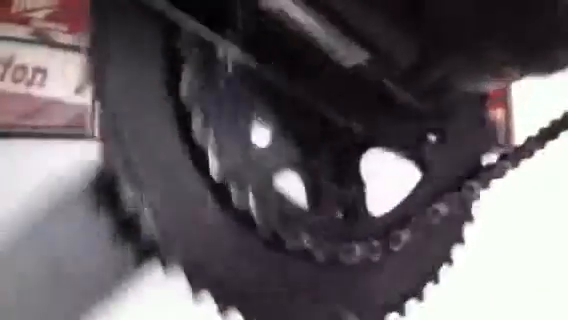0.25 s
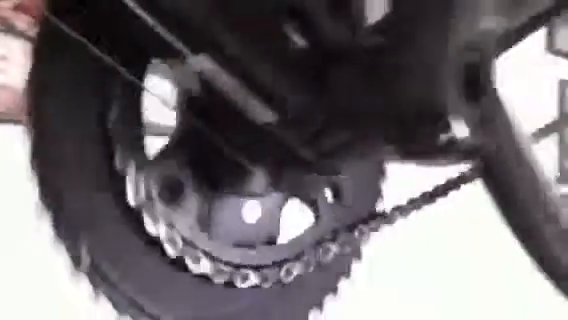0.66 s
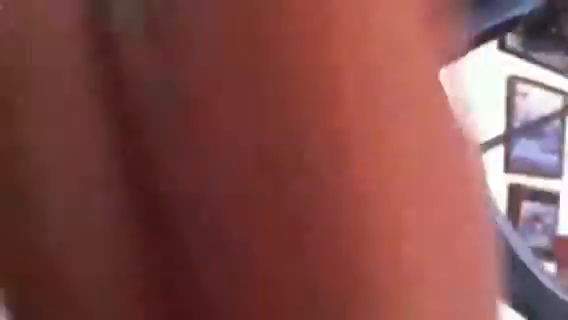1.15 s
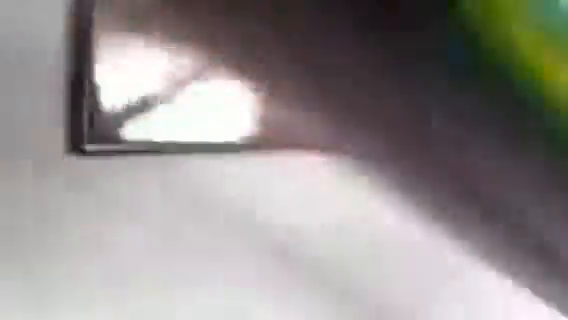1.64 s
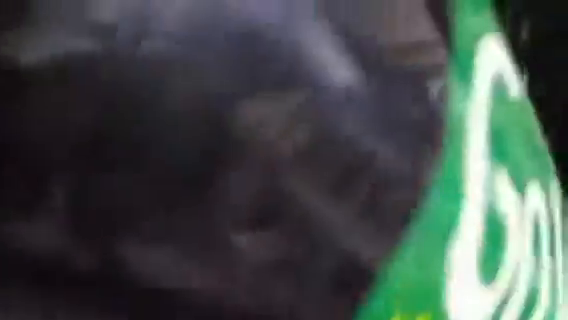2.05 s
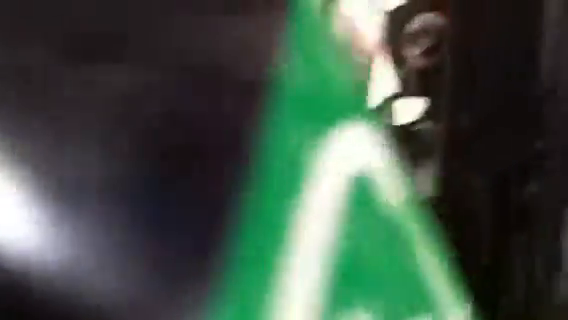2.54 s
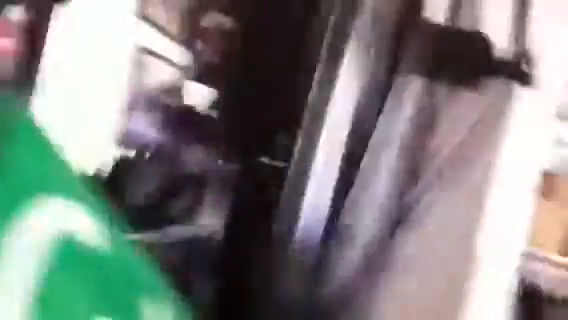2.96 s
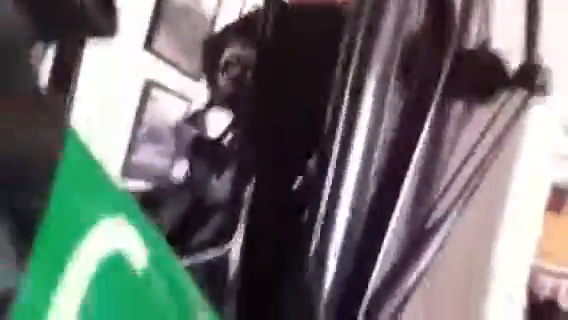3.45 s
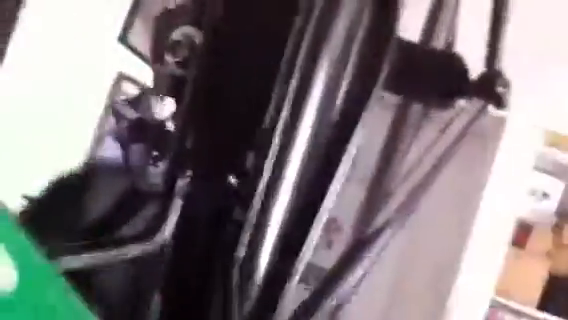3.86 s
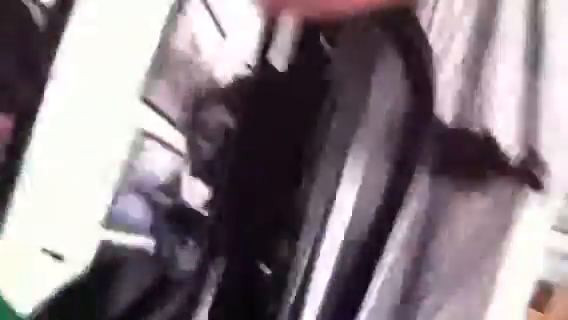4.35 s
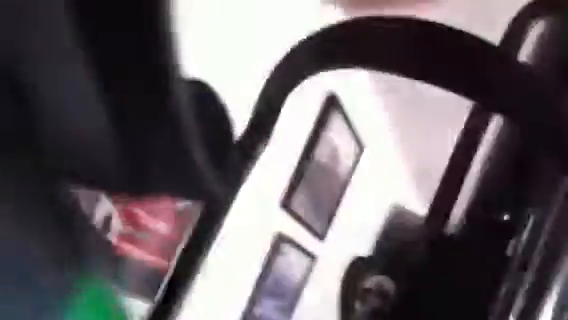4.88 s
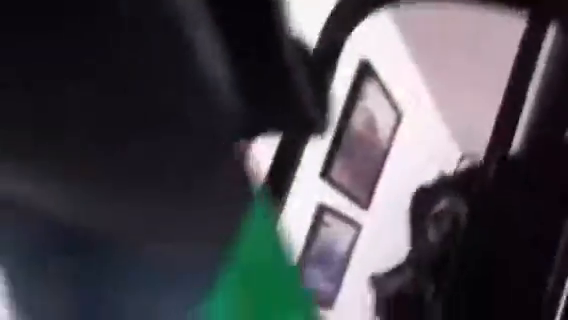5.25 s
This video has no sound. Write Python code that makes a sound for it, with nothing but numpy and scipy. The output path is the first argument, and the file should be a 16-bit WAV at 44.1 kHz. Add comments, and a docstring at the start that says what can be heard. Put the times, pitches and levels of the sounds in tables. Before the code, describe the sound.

A hand-held microphone moves along a bicycle drivetrain indoors. Soft metallic chain ticking gathers speed and loudness, punctuated by sharp link snaps and low thuds. Nine separate pawl clicks come early, two more later. After a dense, fast chain clatter the crank stops and rapid freehub clicks fuse into a harsh metallic buzz, with only a short room reverberation.

```python
"""A bicycle on a stand in a small room is cranked by hand, heard from a hand-held microphone moving along it.
First the chain ticks as impulses exciting sprocket and frame modes, and gathers speed; dull knocks, decaying
noise bursts with a low tone, come from handling. Twice the wheel overruns the crank and pawls click singly;
a hand brushes the microphone, as shaped noise, during the first. The crank runs on faster, then stops,
and freehub clicks at a rising rate blend into a loud buzz."""
import sys
import numpy as np
from scipy import signal
from scipy.fft import rfft, irfft
from scipy.io import wavfile

SR = 44100
rng = np.random.default_rng(int(sys.argv[2]) if len(sys.argv) > 2 else 0)


def write(x):
    x = np.atleast_2d(x).T
    wavfile.write(sys.argv[1], SR, np.round(np.clip(x, -1, 1) * 32767).astype(np.int16))


N = 242991
TIME = np.arange(N) / SR

# broad spectrum of the quiet room: (frequency [Hz], relative level [dB])
ROOM_COLOUR = [(25, -18), (65, -19), (120, -3), (280, 1), (500, -14.5), (1000, -7), (3000, -13.5),
               (8000, -18.5), (15000, -17.5)]
# broad spectrum of a hand on the microphone: (frequency [Hz], relative level [dB])
BRUSH_COLOUR = [(25, -16), (70, -9), (120, 0.5), (350, -1), (700, 1.5), (1100, 9), (1500, -5), (3000, -7.5),
                (9000, -40)]
# dull knocks on frame and stand: (time [s], level [dB], pitch [Hz], T60 [s])
KNOCKS = [(1.409, -44, 186, 0.059), (1.486, -49, 185, 0.19), (1.578, -45, 179.6, 0.2),
          (2.222, -39.5, 275.5, .1), (3.146, -26, 384.5, 0.11)]
# chain speed, wound up, eased off once and wound up again: (time [s], rate [links/s])
CHAIN_SPEED = [(0, 16), (.1, 28), (.55, 28), (1.2, 40), (2.45, 45.5), (2.85, 39), (3.0, 30), (3.3, 31),
               (4.7, 72)]
# the microphone moves closer to the chain: (time [s], level at the usual speed [dB])
NEARNESS = [(0, -74), (.25, -63), (.85, -57.5), (1.6, -54), (2.1, -47), (2.5, -49.5), (2.7, -43.5),
            (2.9, -48), (3.08, -41), (4.0, -40), (4.7, -35.5)]
# the hardest snaps of a link onto a tooth: (time [s], relative level [dB])
SNAPS = [(0.2974, -42.5), (0.4326, -40), (0.5784, -39.5), (0.7425, -44), (2.155, -31.5), (2.1914, -28.5),
         (2.2804, -30), (2.3507, -30), (2.603, -24), (2.7467, -27), (2.827, -26), (3.3657, -33.5),
         (3.6952, -20.5), (4.1011, -18.5), (4.137, -21.5), (4.1714, -20.5), (4.364, -17.5)]
# resonances of sprockets and frame: (frequency [Hz], width [Hz], lift [dB])
CHAIN_MODES = [(1710, 30, -4), (1830, 77, 5), (2350, 20, 1), (2914, 40, 8), (3197, 144, 12), (4250, 64, 4),
               (5300, 330, 5.5), (5970, 150, 5), (6900, 51, -2), (9500, 126, 7)]
# broad spectrum of the chain: (frequency [Hz], relative level [dB])
CHAIN_COLOUR = [(200, -21), (700, -14.5), (1100, -7), (1450, 1.5), (2200, 1), (2600, -3), (3200, -5.5),
                (3800, -3.5), (5500, -4), (7500, -3), (9400, -3.5), (10400, -11), (14000, -9.5),
                (15500, -27)]
# resonances in the frame's rumble: (frequency [Hz], width [Hz], lift [dB])
FRAME_MODES = [(161, 18, 7.6), (315, 11, 1.5), (450, 100, 3.7), (774, 65, 10.3)]
# broad spectrum of the frame's rumble: (frequency [Hz], relative level [dB])
FRAME_COLOUR = [(30, -32), (75, -40), (140, -2.5), (330, 5), (600, 2.5), (850, -1), (1300, -1), (3000, -22)]
# parts of the drive stand out as the microphone passes; a lift of 0 changes nothing:
# (time of middle [s], half length [s], frequency [Hz], width [Hz], lift [dB])
SINGING = [(2.6, 0.55, 6040, 496, 0), (4.175, 0.063, 1700, 270, 8.5), (4.194, .75, 9706, 250, 7.5),
           (4.547, 0.093, 3070, 268, 9.5)]
# single pawl clicks: (time [s], relative level [dB])
PAWLS = [(1.6468, -21), (1.7096, -20), (1.754, -19.5), (1.792, -18.5), (1.8300, -18.5), (1.866, -19.5),
         (1.907, -19), (1.952, -22), (2.0093, -20.5), (2.926, -21.5), (2.9946, -21.5)]
# freehub rate as the crank comes to rest: (time [s], rate [clicks/s])
HUB_SPEED = [(4.75, 48), (4.8, 56), (4.9, 85.5), (5.0, 100.7), (5.08, 103), (5.2, 101.6), (5.36, 111.3),
             (5.44, 109.5), (5.51, 102.5)]
# resonances of hub shell, pawls and spokes: (frequency [Hz], width [Hz], lift [dB])
HUB_MODES = [(740, 140, 6.5), (1620, 40, 1.5), (1864, 45, 10), (2088, 70, 8), (2236, 45, 7), (2424, 35, 5),
             (2542, 30, 4.5), (2920, 40, 4), (3130, 60, 4), (4262, 90, 5), (4780, 70, 3), (5178, 80, 3.5),
             (5492, 60, 4), (5602, 40, 6), (5785, 80, 8), (6280, 70, 4), (6770, 90, 4), (7920, 140, 4),
             (8372, 50, 4), (8687, 50, 3), (9305, 70, 8.5), (9705, 70, 4), (11140, 100, 4), (12500, 80, 3),
             (13100, 120, 3)]
# broad spectra of the hub, heard beside the frame, behind the tyre and in the open:
# (frequency [Hz], relative level [dB])
HUB_BESIDE = [(100, -52), (700, -22.5), (1250, -16.5), (1900, -4.5), (2900, -8.5), (3600, -15), (4300, -10),
              (5500, -6), (6500, -11.5), (8000, -2), (9300, -1), (12000, -1), (14000, -8), (15800, -19)]
HUB_BEHIND = [(100, -29), (600, -26), (1400, -12.5), (2100, -3.5), (3000, -5), (3600, -18), (4400, -8.5),
              (6000, -7), (7100, -4.5), (7800, 0.5), (11000, -7), (12700, -1), (14000, -14), (15500, -18)]
HUB_OPEN = [(80, -47.5), (300, -26.5), (750, -23.5), (1150, -18.5), (1600, -8.5), (2050, 0), (2700, -7),
            (3650, -13.5), (4350, -6), (5600, -1), (6700, -7), (8200, -2), (10100, -4), (13200, -6.5),
            (15700, -19)]

# a brush of the hand, and the knocks: round low tone against clatter, and the frame's ring
BRUSH_S, BRUSH_DB = 1.822, -30.5
BRUSH_ATTACK_S, BRUSH_HOLD_S, BRUSH_T60_S = 0.011, 0.038, .1
THUMP_DB = -6
FRAME_RING_HZ, FRAME_RING_T60_S = 327, 1
# a faster chain is louder, and its glints gain a little more: dB per doubling of speed
USUAL_LINKS_PER_S = 40
LOUDER_DB, BRIGHTER_DB = 6.5, 0.5
CHAIN_STOP_S, CHAIN_FADE_DB_PER_S = 4.735, 117
# ticks lie below TREBLE_HZ, glints above; glint (at the usual speed) and rumble levels against the ticks
TREBLE_HZ, GLINT_DB, RUMBLE_DB = 6640, -9, -10.5
# uneven seating of links, and loose rollers against the links
LINK_SPREAD_DB, INNER_OUTER_DB = 2, 1
ROLLERS_PER_S, ROLLER_DB, ROLLER_SPREAD_DB = 340, 0.5, 5.5
# the link after a hard snap, against the snap
NEXT_LINK_DB = -8.5
# pawl drops are nearly equal, with a swell once per turn of the ratchet
COAST_S = 4.75
RATCHET_TEETH, STRONGEST_TOOTH = 24, 22
DROP_DB, DROP_SWELL_DB, DROP_SPREAD_DB = -16, 0.6, 0.94
# the hub shell's low ring: lift and its swell per turn
SHELL_HZ, SHELL_DB, SHELL_SWELL_DB = 2100, 0.5, 0.5
CUTOFF_HZ = 16000


def from_db(db):
    """Logarithmic level: decibels to amplitude gain."""
    return 10 ** (np.asarray(db) / 20)


def rms_one(x):
    """Normalisation of power: scale to rms 1."""
    return x / np.sqrt(np.mean(x ** 2) + 1e-20)


def in_time(rows):
    """Linear interpolation: each column of a curve at every sample."""
    s, *columns = np.transpose(rows)
    return [np.interp(TIME, s, c) for c in columns]


def convolve(x, response):
    """Superposition: pass a sound through an impulse response."""
    return signal.oaconvolve(x, response)[:len(x)]


def band(x, hz, width_hz):
    """Simple resonance: a single peak with gain 1 on top."""
    return signal.lfilter(*signal.iirpeak(hz, hz / width_hz, fs=SR), x)


def crossover(x, side):
    """Band splitting: keep the "low" or "high" side of the treble limit."""
    return signal.sosfilt(signal.butter(5, TREBLE_HZ, side, fs=SR, output="sos"), x)


def resonate(x, colour, modes=(), size=8192):
    """Modal resonance: a minimum-phase filter of unit power, modes standing out of a broad colour."""
    hz = np.maximum(np.arange(size // 2 + 1) * SR / size, 1)
    colour_hz, colour_db = np.transpose(colour)
    broad = from_db(np.interp(np.log(hz), np.log(colour_hz), colour_db))
    lift = sum((from_db(db) ** 2 - 1) / (1 + (2 * (hz - f) / width) ** 2) for f, width, db in modes)
    gain = broad * np.sqrt(np.maximum(1 + lift, .5))
    # folding the cepstrum makes the response causal
    cepstrum = irfft(np.log(rms_one(gain)))
    minimum_phase = np.r_[cepstrum[0], 2 * cepstrum[1:size // 2]]
    return convolve(x, irfft(np.exp(rfft(minimum_phase, size))))


def impulses(times, sizes):
    """Impulsive excitation: one impulse for each contact."""
    out = np.zeros(N)
    samples = np.round(np.asarray(times) * SR).astype(int)
    np.add.at(out, np.clip(samples, 0, N - 1), sizes)
    return out


def tooth_times(per_s):
    """Phase accumulation: the moments at which one more tooth has gone by."""
    return TIME[1:][np.diff(np.floor(np.cumsum(per_s) / SR)) > 0]


def shudder(hits, rise_s, t60, alike, turns_per_s=0.7037, size=4096):
    """Multipath scattering: hits swell and die in metal, a share of power alike; top rms is the hit size."""
    age = TIME[:size]
    shape = (1 - np.exp(-(age / rise_s) ** 2)) * from_db(-60 * age / t60)
    shape = shape / shape.max()
    paths = rng.standard_normal((2, size)) * shape
    # flatten the spectrum again and again: many paths smear the hit but hardly colour it
    for _ in range(4):
        paths = irfft(np.exp(1j * np.angle(rfft(paths)))) * shape ** .25
    paths = rms_one(paths) * np.sqrt(np.mean(shape ** 2))
    # the paths change slowly as the microphone moves
    angle = 2 * np.pi * turns_per_s * TIME
    same = convolve(hits * np.cos(angle), paths[0]) + convolve(hits * np.sin(angle), paths[1])
    fresh = rng.standard_normal(N) * np.sqrt(np.abs(convolve(hits ** 2, shape ** 2)))
    alike = np.clip(alike, 0, 1)
    return np.sqrt(alike) * same + np.sqrt(1 - alike) * fresh


def room(x, wet_db, t60):
    """Diffuse reverberation: direct sound plus a decaying tail, delayed by the nearest wall and duller."""
    age = TIME[:SR]
    tail = rng.standard_normal(SR) * from_db(-60 * age / t60) * (age > .005)
    tail = signal.sosfilt(signal.butter(1, 7000, fs=SR, output="sos"), tail)
    return x + from_db(wet_db) * convolve(x, tail / np.linalg.norm(tail))


def quiet_room():
    """Stationary noise: the steady, coloured background of the room."""
    return from_db(-66) * resonate(rng.standard_normal(N), ROOM_COLOUR)


def brush():
    """Friction noise: the hand lands on the microphone, slides for a moment and lifts."""
    age = TIME - BRUSH_S
    landing = np.clip(age / BRUSH_ATTACK_S, 0, 1)
    lifting_age = np.maximum(age - BRUSH_ATTACK_S - BRUSH_HOLD_S, 0)
    envelope = landing * from_db(-60 * lifting_age / BRUSH_T60_S)
    return from_db(BRUSH_DB) * envelope * resonate(rng.standard_normal(N), BRUSH_COLOUR)


def knock(s, level_db, hz, t60):
    """Damped vibration: a soft blow with a round low thump, a weaker resonance near the octave and a faint clack."""
    age = TIME[:SR // 2]
    shape = (1 - np.exp(-age / .003)) * from_db(-60 * age / t60)
    shape = shape / shape.max()
    blow = np.sign(rng.standard_normal(len(age))) * shape
    colour = [(hz / 5, -30), (hz * .5, -15), (hz * 0.89, 0), (hz * 1.42, -1), (hz * 1.42, -15),
              (hz * 1.94, -7), (hz * 2.95, -15), (hz * 5.5, -14), (hz * 12, -38), (hz * 30, -65)]
    thump = from_db(THUMP_DB) * np.sin(2 * np.pi * hz * age) * shape
    sound = from_db(level_db) * (resonate(blow, colour) + thump)
    return np.r_[np.zeros(round(s * SR)), sound, np.zeros(N)][:N]


def handling():
    """Impact and lingering resonance: knocks leave the frame ringing, and a hand brushes the microphone."""
    knocks = sum(knock(*row) for row in KNOCKS)
    frame = band(knocks, FRAME_RING_HZ, 37)
    lingering = room(frame, wet_db=-1.0, t60=FRAME_RING_T60_S) - frame   # only the tail
    return room(knocks, wet_db=-13.5, t60=0.19) + lingering + brush()


def link_hits():
    """Periodic impact: links seat, inner and outer ones differing, while rollers rattle at random between."""
    per_s, = in_time(CHAIN_SPEED)
    seats = tooth_times(per_s)
    # ordinary links make way for the hard snaps
    to_snap = np.abs(seats[:, None] - np.array(SNAPS)[:, 0]).min(axis=1)
    seats = seats[to_snap > .008]
    chance = np.clip(rng.standard_normal((len(seats), 2)), -2, 1)
    inner_outer = (-1) ** np.arange(len(seats))
    sizes = from_db(LINK_SPREAD_DB * chance[:, 0] + INNER_OUTER_DB * inner_outer)
    sizes = sizes / np.sqrt(np.interp(seats, TIME, per_s))   # even power at any rate
    links = impulses(seats + .0005 * chance[:, 1], sizes)
    roller_sizes = from_db(ROLLER_SPREAD_DB * np.clip(rng.standard_normal(N), -2, 2))
    rollers = (rng.random(N) < ROLLERS_PER_S / SR) * roller_sizes
    return rms_one(links) + from_db(ROLLER_DB) * rms_one(rollers)


def snap_hits():
    """Paired impact at a tight spot: one link snaps onto its tooth and the next follows more softly."""
    s, level_db = np.transpose(SNAPS)
    next_s = s + 1 / np.interp(s, *np.transpose(CHAIN_SPEED))
    return impulses(s, from_db(level_db)) + impulses(next_s, from_db(level_db + NEXT_LINK_DB))


def chain():
    """Forced modal vibration: links tick in sprockets and frame; some land sharply and glint in the treble."""
    per_s, = in_time(CHAIN_SPEED)
    near_db, = in_time(NEARNESS)
    doublings = np.log2(per_s / USUAL_LINKS_PER_S)
    glint_db = GLINT_DB + BRIGHTER_DB * doublings
    # the chain dies away as the crank stops
    fade_db = CHAIN_FADE_DB_PER_S * np.maximum(TIME - CHAIN_STOP_S, 0)
    running = from_db(near_db + LOUDER_DB * doublings - fade_db)

    hits = link_hits()
    snaps = shudder(from_db(-7) * snap_hits(), rise_s=0.00065, t60=0.033, alike=0.014)
    ticks = running * rms_one(shudder(hits, rise_s=0.0026, t60=0.042, alike=0.036)) + snaps
    ticks = crossover(resonate(ticks, CHAIN_COLOUR, CHAIN_MODES), "low")

    sharpness = from_db(8.3 * np.clip(rng.standard_normal(N), -2, 2))
    glints = shudder(hits * sharpness, rise_s=0.0011, t60=0.059, alike=0.057)
    glints = rms_one(crossover(resonate(glints, CHAIN_COLOUR, CHAIN_MODES), "high"))

    rumble = rms_one(shudder(hits, rise_s=0.0029, t60=0.2, alike=0.016))
    rumble = resonate(rumble, FRAME_COLOUR, FRAME_MODES)
    rattle = ticks + running * (from_db(glint_db) * glints + from_db(RUMBLE_DB) * rumble)

    for middle_s, half_s, hz, width_hz, lift_db in SINGING:
        swell = np.exp(-((TIME - middle_s) / half_s) ** 2)
        rattle = rattle + (from_db(lift_db * swell) - 1) * band(rattle, hz, width_hz)
    return room(rattle, wet_db=-13.5, t60=0.23)


def single_clicks():
    """Ratchet impact: pawls drop singly while the microphone moves from the frame to behind the tyre."""
    s, level_db = np.transpose(PAWLS)
    drops = shudder(impulses(s - .001, from_db(level_db + 4.0)), rise_s=0.0043, t60=0.029, alike=0.21)
    behind = TIME > 2.5
    clicks_beside = resonate(drops * ~behind, HUB_BESIDE, HUB_MODES)
    clicks_behind = resonate(drops * behind, HUB_BEHIND, HUB_MODES)
    return room(clicks_beside + clicks_behind, wet_db=-11.0, t60=0.097)


def buzz():
    """Harmonics of a pulse train: fast pawl drops fuse into a tone, blurred in the treble by uneven teeth."""
    per_s, = in_time(HUB_SPEED)
    coasting_per_s = per_s * (TIME > COAST_S)
    teeth = np.cumsum(coasting_per_s) / SR
    swell = np.cos(2 * np.pi * (teeth - STRONGEST_TOOTH) / RATCHET_TEETH)
    drops = tooth_times(coasting_per_s)
    rate = np.interp(drops, TIME, per_s)
    chance = rng.standard_normal((len(drops), 2))
    swell_db = DROP_SWELL_DB * np.interp(drops, TIME, swell)
    sizes = from_db(DROP_DB + swell_db + DROP_SPREAD_DB * chance[:, 0])
    # a pawl slips off just before the tooth has passed
    hits = impulses(drops - .15 / rate + .00003 * chance[:, 1], sizes)
    ringing = resonate(shudder(hits, rise_s=0.002, t60=0.048, alike=0.69), HUB_OPEN, HUB_MODES)
    shell_db = SHELL_DB + SHELL_SWELL_DB * swell
    ringing = ringing + (from_db(shell_db) - 1) * band(ringing, SHELL_HZ, 840)
    # the pawl bounces once, more softly, and rings only the shell's low resonances
    bounce = shudder(impulses(drops + 0.00273, sizes), rise_s=0.0012, t60=0.013, alike=1.0)
    bounce = resonate(bounce, HUB_OPEN, HUB_MODES)
    bounce = band(band(bounce, SHELL_HZ, 1100), SHELL_HZ, 1100)
    return room(ringing + from_db(-2.5) * bounce, wet_db=-12.0, t60=0.14)


def scene():
    """Linear superposition: room, handling, drive train and freehub add up in one channel."""
    return (quiet_room() + handling() + chain() + single_clicks() + buzz())[None]


def record(dry):
    """Saturation and band limiting: the highest peaks are rounded and the top is cut."""
    rounded = np.tanh(dry)
    return signal.sosfilt(signal.ellip(12, .2, 80, CUTOFF_HZ, fs=SR, output="sos"), rounded)


dry = scene()
out = record(dry)
write(out)
```